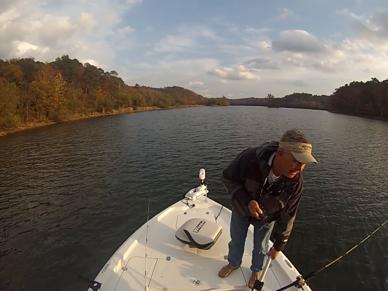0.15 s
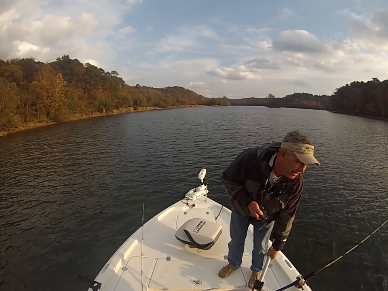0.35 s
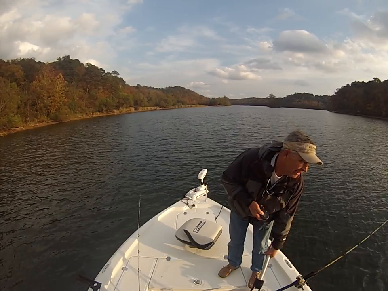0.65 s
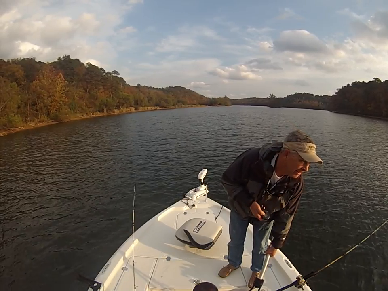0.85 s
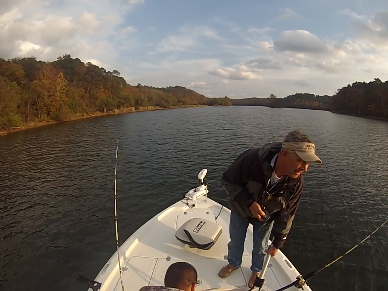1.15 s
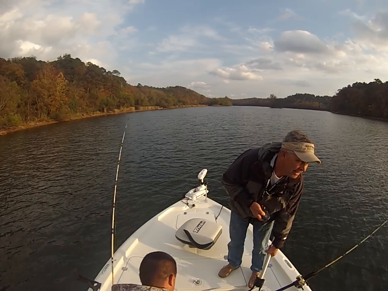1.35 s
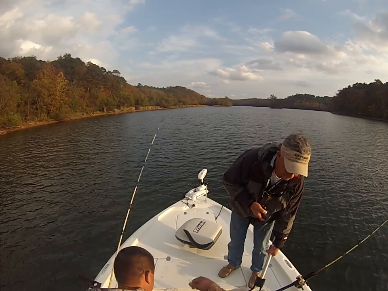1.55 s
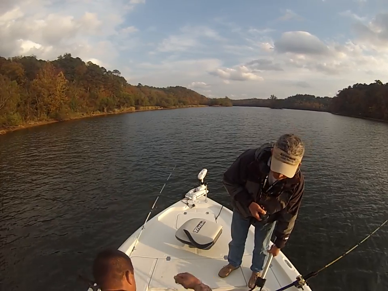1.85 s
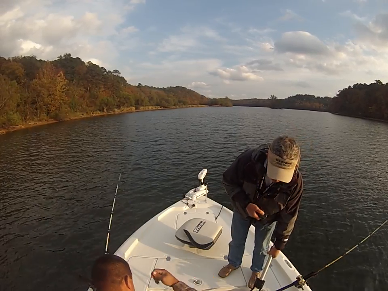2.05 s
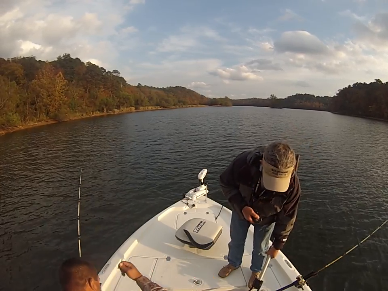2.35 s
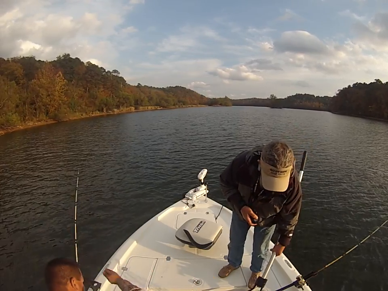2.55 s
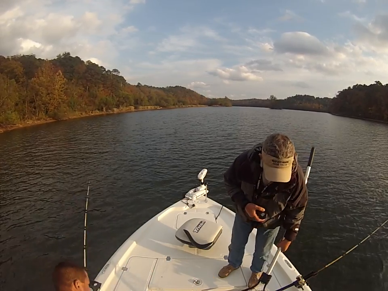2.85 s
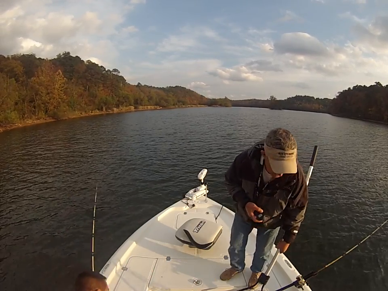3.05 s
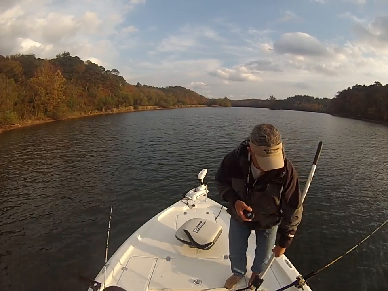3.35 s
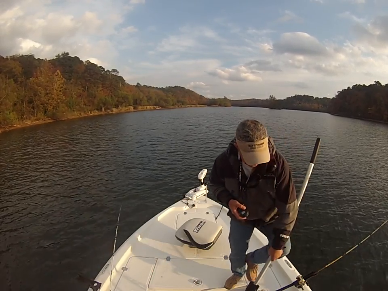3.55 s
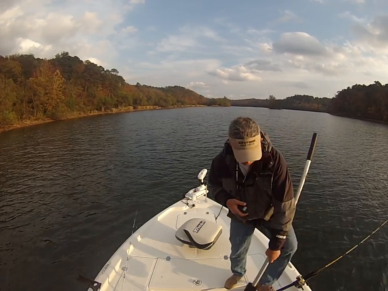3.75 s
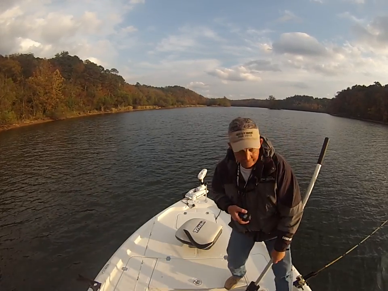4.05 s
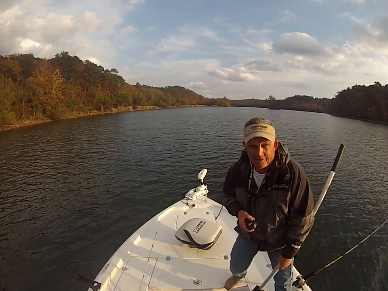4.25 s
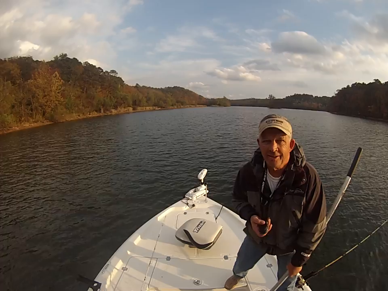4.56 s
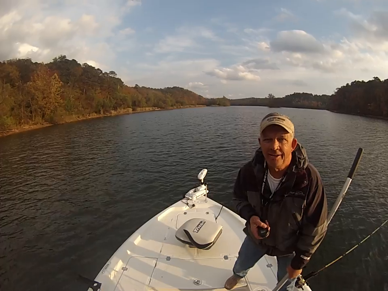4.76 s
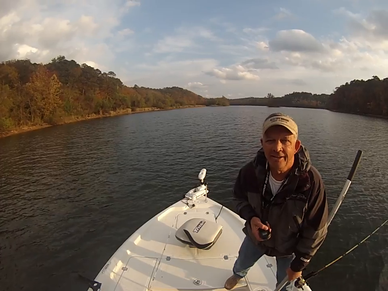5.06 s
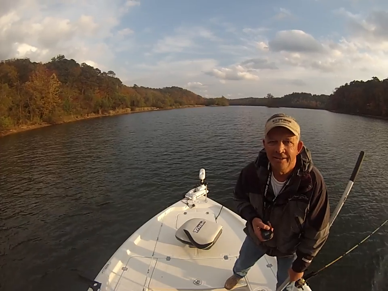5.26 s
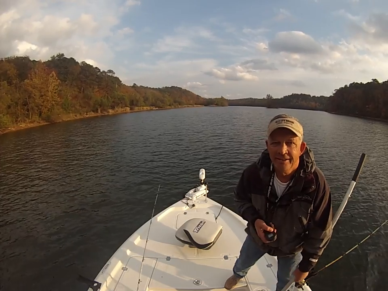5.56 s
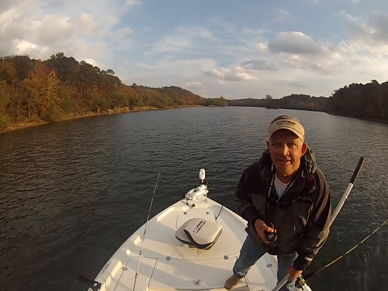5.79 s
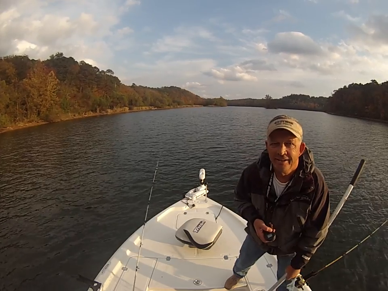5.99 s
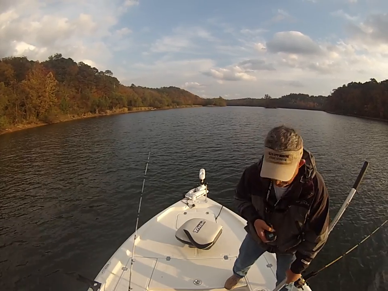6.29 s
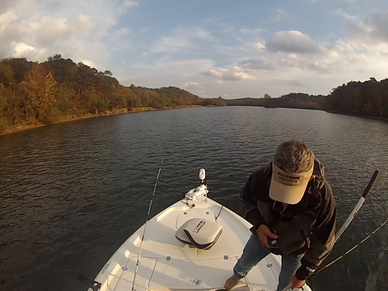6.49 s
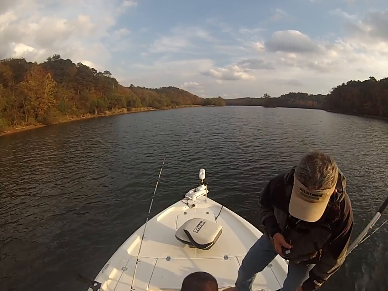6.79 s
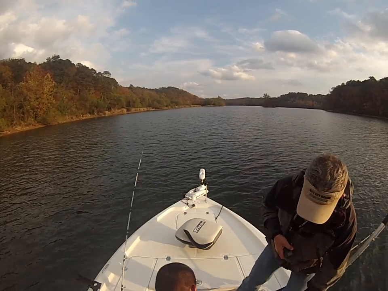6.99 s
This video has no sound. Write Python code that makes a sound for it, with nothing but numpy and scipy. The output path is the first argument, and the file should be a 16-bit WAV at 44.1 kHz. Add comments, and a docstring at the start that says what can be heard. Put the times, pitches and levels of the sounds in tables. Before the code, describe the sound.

On open water, a quiet low rumble with soft hiss and a faint electric motor whine. After two dull taps, a cluster of hard hollow knocks hits the fibreglass deck, one especially sharp, mixed with scuffs. Another busy run of thumps, clacks and dull drags follows, then a pause and one heavy booming step with scrapes and a tiny squeak. Close microphone on the boat, dry, no echo.

```python
"""Shoes and a landing net knock on the foredeck of a fibreglass boat as an angler shifts about on a calm lake.
Each knock sums damped deck modes, a noisy crack and a click; heavy steps boom as swelling, decaying hull tones.
Scuffs and drags are uneven noise passed through deck resonances, and a slipping sole squeaks.
Under them lie shaped noise for air, resonant noise for ripples at the hull, and the faint sine tones
of an electric trolling motor's whine and thrum."""
import sys
import numpy as np
from scipy import signal
from scipy.fft import rfft, irfft
from scipy.io import wavfile
from scipy.ndimage import uniform_filter1d

SR = 44100
rng = np.random.default_rng(int(sys.argv[2]) if len(sys.argv) > 2 else 0)


def bounce(signal):
    """Save signal as a 16-bit WAV file at the path given by the first command-line argument."""
    frames = np.transpose(np.atleast_2d(signal))
    limited = np.clip(frames, -1, 1)
    pcm = np.round(limited * 32767).astype(np.int16)
    wavfile.write(sys.argv[1], SR, pcm)


N = 314388
TIME = np.arange(N) / SR
RING = TIME[:SR]  # the first second, for single events


def undb(db):
    """Logarithmic level: decibels to amplitude gain."""
    return 10 ** (np.asarray(db) / 20)


def unit(x):
    """Normalisation: scale to rms 1."""
    return x / np.sqrt(np.mean(x ** 2))


def burst(x, db, size=882):
    """Short-time level: the loudest stretch of `size` samples gets this rms."""
    return x * undb(db) / np.sqrt(uniform_filter1d(x ** 2, size, mode="constant").max())


def add(out, s, x):
    """Superposition: mix x in from time s."""
    i = int(s * SR)
    out[i:i + len(x)] += x[:N - i]


def walk(rate):
    """Slow random fluctuation: `rate` random values a second, smoothed, with spread near 1."""
    k = int(SR / rate)
    held = np.repeat(rng.standard_normal(N // k + 1), k)
    return unit(uniform_filter1d(held, k)[:N])


def colour(x, points):
    """Spectral shaping: weight x by a curve of (pitch_hz, level_db) points."""
    hz, db = np.transpose(points)
    f = np.arange(len(x) // 2 + 1) * SR / len(x)
    gain = undb(np.interp(np.log(f + 1), np.log(hz), db))
    return irfft(rfft(x) * gain, len(x))


def resonate(x, modes):
    """Parallel resonance: sum x through peaks of (pitch_hz, width_hz, level_db)."""
    return sum(undb(db) * signal.lfilter(*signal.iirpeak(hz, hz / width, SR), x)
               for hz, width, db in modes)


def stroke(start, length, attack, t60):
    """Amplitude envelope: swell, hold until the length is up, then exponential decay."""
    t = TIME - start
    rise = np.sin(np.pi / 2 * np.clip(t / attack, 0, 1)) ** 2
    return rise * undb(-60 * np.clip((t - length) / t60, 0, 3))


# spectrum of air and water noise: pitch_hz, relative level_db per Hz
AIR_SPECTRUM = [(21, -11), (36, 1), (64, -4), (81, -16.5), (109, -11.5), (211, -23.5), (251, -25),
                (866, -30), (934, -29.5), (1060, -31.5), (1140, -29.5), (10000, -49), (15000, -60)]
# hull resonances stirred by ripples: pitch_hz, width_hz, relative level_db
HULL_RESONANCES = [(20, 2.6, 18), (58, 6.9, 21), (120, 55, 0), (221, 43, -2.5), (444, 36, -27),
                   (1070, 61, -53)]


def lake(air_db=-49, lap_db=-56.5):
    """Broadband noise and forced resonance: air rumbles under a smooth hiss, ripples make the hull murmur."""
    air = unit(colour(rng.standard_normal(N), AIR_SPECTRUM))
    ripples = colour(rng.standard_normal(N), [(1200, 47), (3000, -13.0)])
    swell = undb(1.2 * walk(12))
    murmur = swell * unit(resonate(ripples, HULL_RESONANCES))
    return undb(air_db) * air + undb(lap_db) * murmur


# nominal pitches of the motor's whine: pitch_hz
WHINE_HZ = [932, 1032.5, 1072, 2143]
# one swell of each whine tone, in the same order: start_s, length_s, rms level_db before the slow sag
WHINE_SWELLS = [(0.64, 1.8, -64.5), (-1, 7.7, -68.5), (3.0, 3.3, -70.5), (5, 0.82, -75)]
WHINE_ATTACK_S, WHINE_T60_S = 0.43, 4.9
WHINE_REST_DB = -14.5  # level of each tone outside its swell, against its top
WHINE_SAG_DB_PER_S, WHINE_LEVEL_S = 0.6, 3  # the whine sinks slowly; its levels hold at this moment
# harmonics of the propeller thrum: multiple of the shaft rate, rms level_db
THRUM = [(1, -56), (3, -59), (4, -67.5), (5, -67.5), (6, -71.5)]
SHAFT_HZ = 19.8


def motor(drift=0.00059, shaft_drift=0.012):
    """Additive synthesis: thin whine tones drift with the load; shaft harmonics thrum through the hull."""
    turn = 2 * np.pi * np.cumsum(1 + drift * walk(3.7)) / SR
    whine = np.zeros(N)
    for hz, (s, length, db) in zip(WHINE_HZ, WHINE_SWELLS):
        swell = np.maximum(stroke(s, length, WHINE_ATTACK_S, WHINE_T60_S), undb(WHINE_REST_DB))
        whine += undb(db) * swell * np.sin(hz * turn)
    sag = undb(WHINE_SAG_DB_PER_S * (WHINE_LEVEL_S - TIME))
    shaft = 2 * np.pi * SHAFT_HZ * np.cumsum(1 + shaft_drift * walk(4.1)) / SR
    thrum = sum(undb(db) * np.sin(k * shaft + rng.uniform(0, 2 * np.pi)) for k, db in THRUM)
    return np.sqrt(2) * (whine * sag + thrum)  # root two: levels are rms


# shoes dragged dully over the deck: start_s, length_s, level_db
DRAGS = [(3.696, .13, -60), (3.908, 0.17, -54.5), (4.315, 0.022, -46.5), (4.539, 0.17, -53)]
DRAG_ATTACK_S, DRAG_T60_S = 0.023, 0.37
# modes of the deck, also rung by the knocks: pitch_hz, relative level_db
DECK_MODES = [(186, -9), (238, -7.5), (262, -3), (305, -15), (425, -7.5), (468, -1), (486, 2), (535, -6.5),
              (640, -9), (770, -12), (818, 0), (960, -2), (1060, 5.5), (1115, 5), (1178, 5), (1262, 4),
              (1458, -2.5), (1570, -5), (1650, -18), (2060, -7), (2150, -12), (2260, -9), (2420, -5),
              (2590, -11), (2780, -7.5), (3030, -21.5)]


def drag(width_share=0.0096, uneven_db=3):
    """Friction-driven resonance: a soft sole stutters along and stirs mainly the lower deck modes."""
    noise = colour(rng.standard_normal(N), [(500, 5.0), (1200, -14.5), (2000, -18.0)])
    stutter = noise * undb(uneven_db * walk(50))
    sound = unit(resonate(stutter, [(hz, width_share * hz, db) for hz, db in DECK_MODES]))
    return sound * sum(undb(db) * stroke(s, length, DRAG_ATTACK_S, DRAG_T60_S)
                       for s, length, db in DRAGS)


# scuffs of sole or handle: start_s, length_s, rub level_db, gritty edge level_db before grit_db
SCUFFS = [(1.095, 0.028, -59, -73), (2.794, 0.042, -44, -71), (2.929, 0.17, -47.5, -58.5),
          (3.126, 0.05, -61, -67), (3.626, 0.0092, -52, -53), (3.906, .11, -52.5, -61),
          (4.097, 0.064, -67, -65), (5.582, 0.038, -39.5, -59), (5.688, 0.057, -61, -70),
          (5.789, .14, -54.5, -73), (5.93, .1, -48, -73)]
SCUFF_ATTACK_S, SCUFF_T60_S = 0.0086, 0.18
# resonances of the rubbed deck: pitch_hz, width_hz, relative level_db
RUB_RESONANCES = [(471, 13, -1.5), (1110, 8.5, 10.5), (1245, 35, 9.5), (1563, 54, -1)]
# resonances of the gritty edge: pitch_hz, width_hz, relative level_db
GRIT_RESONANCES = [(2220, 240, 14), (2470, 57, 10), (2760, 67, -19)]
# sharp slips of a sole: start_s, peak level_db, pitch_hz, length_s (the peak comes halfway)
SQUEAKS = [(5.94, -37.5, 1245, 0.017), (5.987, -30, 1245, 0.01), (6.891, -51, 1070, 0.029)]


def scuffs(grit_db=-1, slips_per_s=2500, uneven_db=2.0, squeak_jitter=0.032):
    """Stick-slip friction: dense catches ring the deck; now and then a sole slips with a short squeak."""
    caught = rng.random(N) < slips_per_s / SR
    catches = caught * rng.standard_normal(N) * undb(uneven_db * walk(44))
    rub = colour(catches, [(200, 8), (450, 8), (1700, -3.5), (2400, -2.5), (8000, -32)])
    rub = unit(resonate(rub, RUB_RESONANCES))
    grit = colour(catches, [(1200, 0), (2000, -20), (3000, -8.5), (3800, -86)])
    grit = unit(resonate(grit, GRIT_RESONANCES))
    out = np.zeros(N)
    for s, length, rubbing, gritty in SCUFFS:
        mix = undb(rubbing) * rub + undb(gritty + grit_db) * grit
        out += stroke(s, length, SCUFF_ATTACK_S, SCUFF_T60_S) * mix
    t = RING[:SR // 5]
    for s, db, hz, length in SQUEAKS:
        grip = 2 * t / length * np.exp(1 - 2 * t / length)
        slip = 2 * np.pi * hz * np.cumsum(1 + squeak_jitter * walk(263)[:len(t)]) / SR
        add(out, s, undb(db) * grip * (np.sin(slip) + 0.044 * np.sin(2 * slip)))
    return out


# footfalls and shifts of weight: start_s, peak level_db, loaded hull pitch_hz, swell_s, t60_s
STEPS = [(2.275, -37.5, 94.7, 0.0057, 0.55), (2.37, -33.5, 60, 0.028, 0.23),
         (2.509, -34.5, 58, 0.015, 0.44), (2.719, -38.5, 87, 0.008, 0.24), (2.83, -38.5, 58, 0.026, .3),
         (2.912, -36.5, 61.2, 0.018, 0.28), (3.652, -33, 58.4, 0.019, 0.94),
         (3.833, -28.5, 58, 0.028, 0.65), (4.007, -20.5, 53.5, 0.013, 0.24),
         (4.072, -24.5, 54.3, 0.0093, 0.28), (4.181, -26.5, 64.6, 0.0073, 0.29),
         (4.955, -40.5, 60, 0.024, 0.96), (5.598, -14, 63.4, 0.0097, 0.08), (5.651, -16, 57.2, 0.04, 0.42),
         (5.777, -24.5, 60.76, 0.049, 0.72), (6.552, -33, 61.5, 0.031, 0.11),
         (7.05, -39.5, 59, 0.025, 0.59)]
# heels that land hard enough to wake the hull's second mode: start_s, peak level_db
HEELS = [(2.916, -34.5), (3.65, -36.5), (4.012, -33), (5.595, -19.5)]
HEEL_HZ, HEEL_SWELL_S, HEEL_T60_S = 121, 0.007, 0.23


def steps():
    """Damped oscillation: weight comes onto the deck, the hull swings up and rings down."""
    out = np.zeros(N)
    heels = [(s, db, HEEL_HZ, HEEL_SWELL_S, HEEL_T60_S) for s, db in HEELS]
    for s, db, hz, swell, t60 in STEPS + heels:
        rise = np.sin(np.pi / 2 * np.minimum(RING / swell, 1)) ** 2
        fall = undb(-60 * np.maximum(RING - swell, 0) / t60)
        add(out, s, undb(db) * rise * fall * np.sin(2 * np.pi * hz * RING))
    return out


def contact(ms, chatter=0.94):
    """Impact force: one blow, then a brief chatter as the two surfaces settle."""
    t = RING[:SR // 12] / (ms / 1000)
    grains = rng.standard_normal(len(t)) * t * np.exp(-2 * t)
    force = chatter * grains / np.sqrt(np.sum(grains ** 2))
    force[0] += 1
    return force


# shoes and gear knocking on the deck, before the trims in knocks(): start_s, shell level_db,
# then against the shell: wide panel level_db, small panel level_db, hard edge level_db
KNOCKS = [(0.374, -49.5, -7, -3, -32.5), (0.587, -41, -9.5, -4.5, -40), (2.269, -23, -6, -14, -30),
          (2.398, -42, -0.5, -9, -37), (2.497, -13, -41, -12, -16.5), (2.546, -36.5, -11, -1, -29),
          (2.643, -24, -19, -7, -31.5), (2.719, -28.5, -11.5, -4, -41), (2.843, -33.5, -16, -7, -14.5),
          (2.912, -33, -7, -3.5, -19), (3.646, -21.5, -12, -4, -32.5), (3.725, -35.5, -13, -3, -33),
          (3.83, -45.5, 5, 6.5, -36), (4.069, -50, 1.5, 2.5, -38), (4.194, -51.5, 6, 2.5, -20),
          (4.25, -20.5, -24.5, -11, -35), (4.362, -44, -10.5, 0, -38), (4.451, -32.5, -13, -9, -34),
          (4.956, -31, -20, -9, -45), (5.591, -29.5, -2, 2, -18.5), (5.6, -22, -14, -13, -21.5),
          (5.626, -32.5, -1.5, -16, -25), (6.594, -55.5, 6, -18, -38)]
# light clacks of the net handle, before the same trims: start_s, shell level_db, hard edge against it level_db
CLACKS = [(1.885, -49, -6.5), (2.808, -33.5, -20), (2.876, -34.5, -24.5), (2.982, -43, -8),
          (3.754, -36.5, -7.5), (3.77, -30, -24.5), (3.892, -31.5, -23), (3.96, -36, -20),
          (5.641, -36.5, -25)]
CLACK_WIDE_DB, CLACK_SMALL_DB = -15, -24  # the handle is too light to move the low panels much


def blows():
    """Distribution of impact energy: (start_s, then level_db of shell, wide panel, small panel, hard edge)."""
    heavy = [(s, db, db + wide, db + small, db + hard) for s, db, wide, small, hard in KNOCKS]
    light = [(s, db, db + CLACK_WIDE_DB, db + CLACK_SMALL_DB, db + hard) for s, db, hard in CLACKS]
    return heavy + light


# limits between the modes of wide panel, small panel, shell and hard edge: pitch_hz
REGISTER_HZ = [340, 700, 1800]
# spectrum of the contact click: pitch_hz, relative level_db
CLICK_SPECTRUM = [(1500, -30), (3000, -3), (4000, 0), (5300, 0), (7500, -4), (10500, -14), (13000, -28)]
# the click has this level, before its trim, at this edge level, and grows with it
CLICK_DB, CLICK_PER_DB, CLICK_EDGE_DB = -58.5, 0.5069, -44.5
# spectrum of the crack of a hard edge: pitch_hz, relative level_db
CRACK_SPECTRUM = [(900, -13), (1550, 4.5), (1850, -5), (2150, 4), (3000, -15.5), (4500, -23), (8000, -49)]
CRACK_DB, CRACK_T60_S = -0.5, 0.1
SETTLE_MS, SETTLE_MS_PER_DB, SETTLE_ABOVE_DB = 5, 0.04, -20  # the strongest blows chatter longer


def knocks(shell_db=-9.5, panel_db=-2, small_db=-3.0, edge_db=-3, click_db=-1.0,
           detune=0.011, place_db=-0.56,  # random spread of each mode's pitch and level
           blur=0.34, blur_t60=0.2, click_t60=0.061,
           lead_ms=2.535,  # the ring starts this long before the click
           hardness=0.88, t60_at_khz=0.082):
    """Modal synthesis: each blow rings the deck; where it lands decides each panel size's share."""
    out = np.zeros(N)
    hz, mode_db = np.transpose(DECK_MODES)
    t60 = t60_at_khz * (1000 / np.minimum(hz, 1400)) ** 0.77  # the laminate damps high modes sooner
    register = np.searchsorted(REGISTER_HZ, hz)
    # neighbouring modes oppose at first, so the ring builds as it crosses the deck
    sign = (-1) ** np.arange(len(hz))[:, None]
    t = RING[:SR // 3]
    decay = undb(-60 * t / t60[:, None])
    onset = 1 - np.exp(-t * hz[:, None])  # a panel needs about a cycle to get going
    for s, shell, panel, small, edge in blows():
        start = s - lead_ms / 1000
        pitch_chance, level_chance = rng.standard_normal((2, len(hz)))
        pitch = hz * (1 + detune * pitch_chance)
        waves = sign * np.sin(2 * np.pi * pitch[:, None] * t)
        # a hard contact drives the upper modes, a soft one leaves them quiet
        upper_db = hardness * np.clip(edge - shell + 25, -14, 8) * (hz > 1350)
        level = undb(mode_db + upper_db + place_db * level_chance)[:, None]
        modes = level * waves * decay * onset
        force = contact(SETTLE_MS + SETTLE_MS_PER_DB * max(shell - SETTLE_ABOVE_DB, 0))
        levels = [panel + panel_db, small + small_db, shell + shell_db, edge + edge_db]
        for k, db in enumerate(levels):
            ring = signal.fftconvolve(modes[register == k].sum(0), force)
            add(out, start, burst(ring, db))

        # a hard edge adds a short, dense crack
        crack = colour(rng.standard_normal(len(t)), CRACK_SPECTRUM)
        crack *= (1 - np.exp(-t / 0.002)) * undb(-60 * t / CRACK_T60_S)
        add(out, start, burst(crack, edge + CRACK_DB))

        # noise for the many weak, heavily damped modes between the strong ones
        clutter = colour(rng.standard_normal(len(t)), [(100, 1.5), (450, 0.0), (800, -2.0), (1250, -0.5),
                                                       (1900, -26.0), (2800, -16.5), (3800, -88)])
        clutter *= (1 - np.exp(-t / 0.0022)) * undb(-60 * t / blur_t60)
        add(out, start, blur * burst(clutter, shell + shell_db))

        click = CLICK_DB + CLICK_PER_DB * (edge - CLICK_EDGE_DB)
        tick = colour(rng.standard_normal(len(t)), CLICK_SPECTRUM)
        tick *= (1 - np.exp(-t / 0.00064)) * undb(-60 * t / click_t60)
        # only the harder contacts click above the hiss
        add(out, s, burst(tick, click + click_db) * np.clip((click + 67) / 6, 0, 1))
    return out


def scene():
    """Free-field superposition: all sources sum at one point on the boat; open water gives no echo."""
    return (lake() + motor() + drag() + scuffs() + steps() + knocks())[None]


TOP_HZ = 14900


def record(dry):
    """Low-pass filtering: a steep elliptic filter cuts the treble above TOP_HZ."""
    return signal.sosfilt(signal.ellip(8, .2, 70, TOP_HZ, fs=SR, output="sos"), dry)


dry = scene()
out = record(dry)
bounce(out)
```